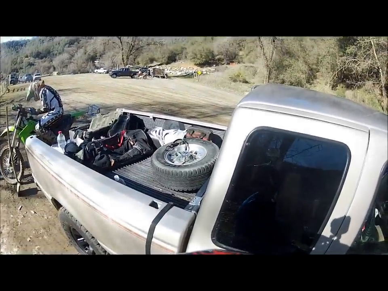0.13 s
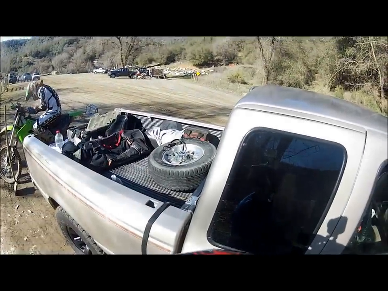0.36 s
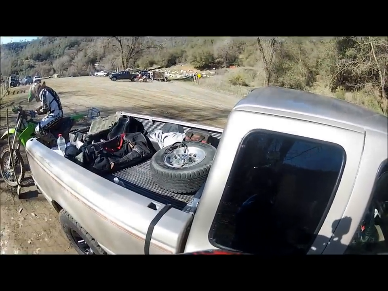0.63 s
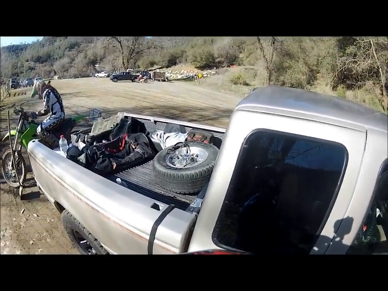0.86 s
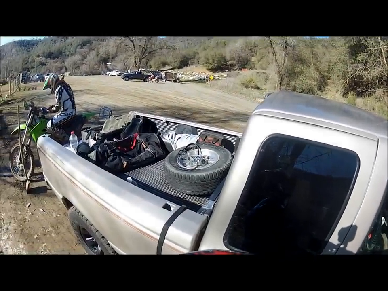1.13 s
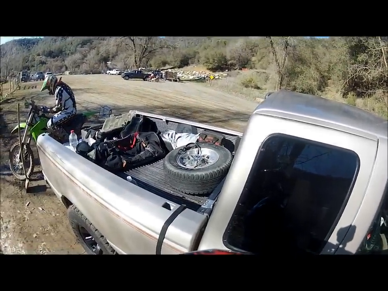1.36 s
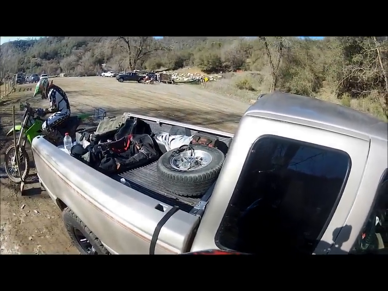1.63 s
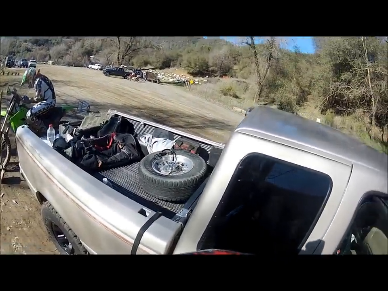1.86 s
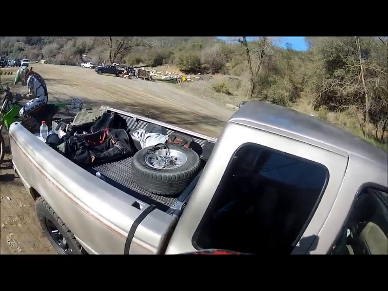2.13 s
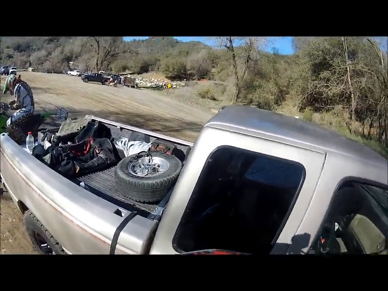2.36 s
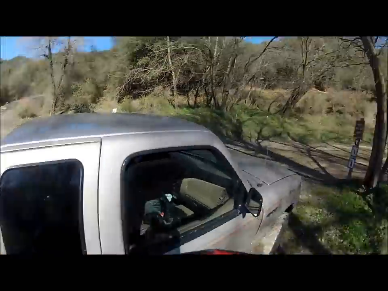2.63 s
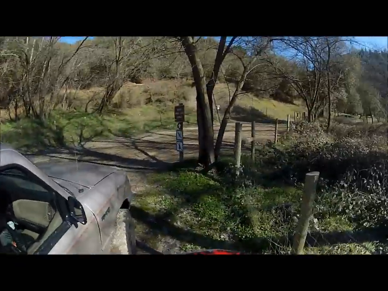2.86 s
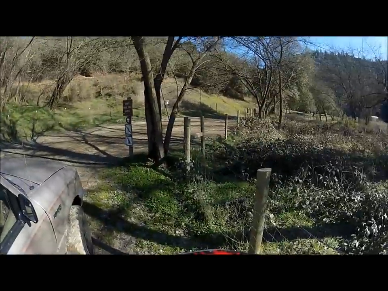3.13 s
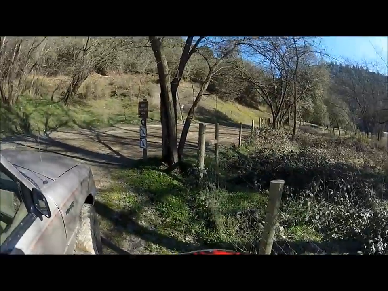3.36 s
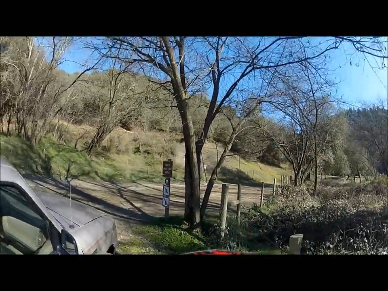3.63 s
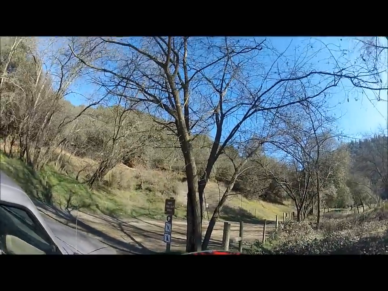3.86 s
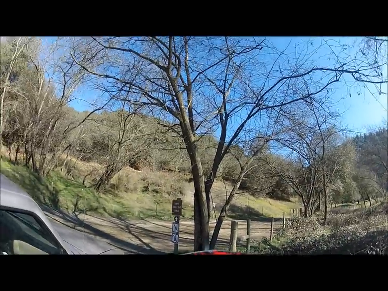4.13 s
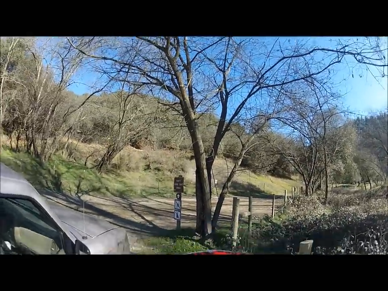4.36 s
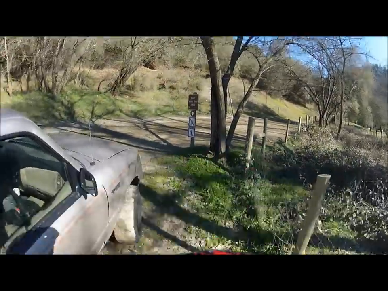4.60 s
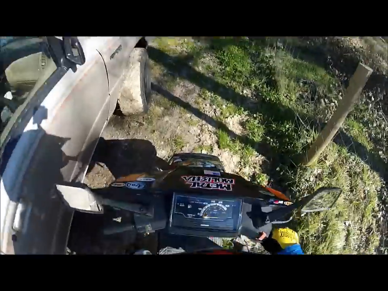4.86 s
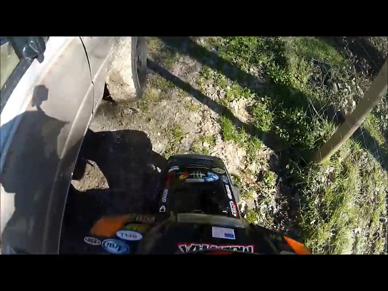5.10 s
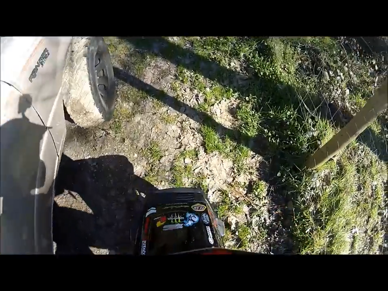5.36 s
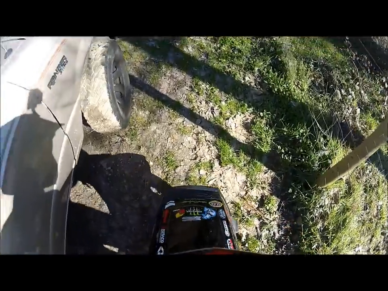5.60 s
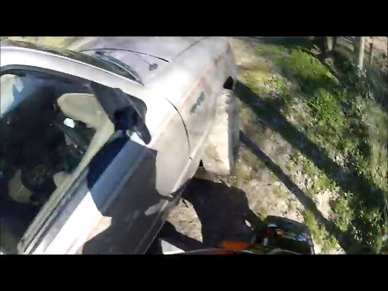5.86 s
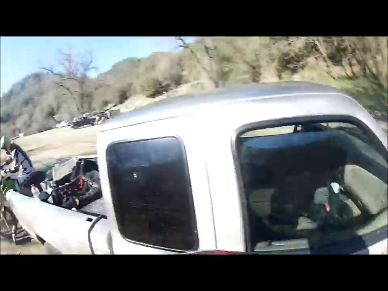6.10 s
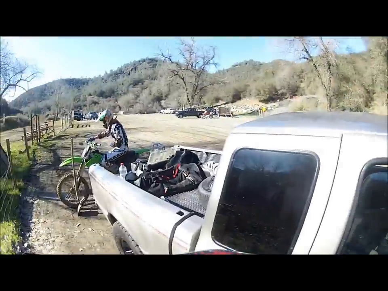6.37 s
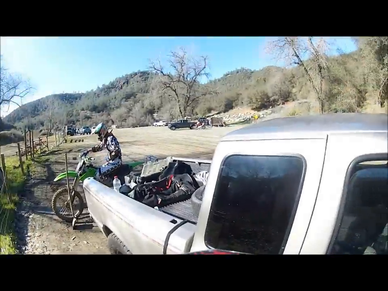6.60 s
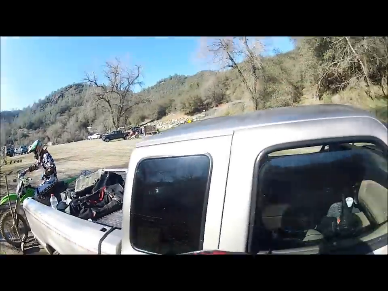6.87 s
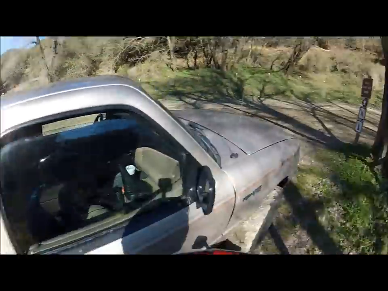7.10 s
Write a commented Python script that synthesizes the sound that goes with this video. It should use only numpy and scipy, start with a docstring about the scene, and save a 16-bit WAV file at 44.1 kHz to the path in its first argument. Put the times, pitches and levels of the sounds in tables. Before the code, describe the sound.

Close, gritty dirt bike engine: two throttle blips falling back to a slow thumping idle, one faint bird chirp, a gear clunk, then hard rising revs.

```python
"""Outdoors, under a rider's helmet: a single-cylinder four-stroke motorcycle idles, is blipped twice,
clunks into gear and revs away. Each cycle gives a skewed exhaust puff, its echoes in the pipe and a pumping
thump; load adds bark, rasp and knock. Filtered noise makes the drone, rumble, valve rattle and clunks.
A bird, a gliding sine with an overtone, chirps once. A slow converter clips the loudest puffs and holds
each sample, which mirrors the sound into the treble."""
import sys
import numpy as np
from scipy import signal
from scipy.fft import rfft, irfft, next_fast_len
from scipy.io import wavfile
from scipy.ndimage import uniform_filter1d, map_coordinates

SR = 44100
rng = np.random.default_rng(int(sys.argv[2]) if len(sys.argv) > 2 else 0)


def voltage_ratio(decibels):
    """Convert decibels (scalar or array-like) to amplitude ratios, 20 dB per decade."""
    exponent = np.asarray(decibels, float) / 20
    return 10 ** exponent


def put_to_file(sound):
    """Save the sound as 16-bit audio at rate SR, in the file named by the first command-line argument."""
    columns = np.atleast_2d(sound).T  # one column per channel
    safe = np.clip(columns, -1, 1)
    whole_steps = np.round(safe * 32767)
    wavfile.write(sys.argv[1], SR, whole_steps.astype(np.int16))


N = 318843
TIME = np.arange(N) / SR
SHUT_S = 0.09  # time constant of the throttle slide snapping shut


def unit(x):
    """Normalisation: scales x to rms 1."""
    return x / np.sqrt(np.mean(x ** 2) + 1e-20)


def curves(rows):
    """Linear interpolation: one value per sample for each column after the time."""
    s, *columns = np.transpose(rows)
    return [np.interp(TIME, s, column) for column in columns]


def filtered(x, response):
    """Linear filtering: multiplies the spectrum of x by a complex response of frequency."""
    size = next_fast_len(N + 8192)
    spectrum = rfft(x, size) * response(np.fft.rfftfreq(size, 1 / SR))
    return irfft(spectrum, size)[:N]


def coloured(x, points):
    """Spectral shaping: x through a curve of (frequency [Hz], level [dB]), at rms 1."""
    hz, db = np.transpose(points)
    return unit(filtered(x, lambda f: voltage_ratio(np.interp(np.log(f + 1), np.log(hz + 1), db))))


def noise():
    """White noise: independent Gaussian samples."""
    return rng.standard_normal(N)


def wobble(rate):
    """Random modulation: a smooth curve through rate random knots a second."""
    knots = rng.standard_normal(int(N * rate / SR) + 4)
    return map_coordinates(knots, [TIME * rate])


def train(times, sizes):
    """Impulse excitation: one sized impulse per time."""
    at = np.round(times * SR).astype(int)
    inside = (at >= 0) & (at < N)
    return np.bincount(at[inside], sizes[inside], N)


def puff(hz, width_hz, lag):
    """Gaussian wave packet: a short pressure swing of peak near 1, skewed by a phase lag in radians."""
    scale = SR / (2 * np.sqrt(2 * np.pi) * width_hz)
    return lambda f: scale * np.exp(-.5 * ((f - hz) / width_hz) ** 2 - 1j * lag)


def dying(x, t60):
    """Exponential decay: every impulse falls by 60 dB in t60 seconds."""
    return signal.lfilter([1], [1, -voltage_ratio(-60 / (t60 * SR))], x)


def resonances(modes):
    """Modal superposition: causal damped modes of (frequency [Hz], width [Hz], level [dB])."""
    def response(f):
        total = 0
        for k, (hz, width, db) in enumerate(modes):
            mode = 1j * f * width / (hz * hz - f * f + 1j * f * width)
            total = total + (-1) ** k * voltage_ratio(db) * mode
        return total
    return response


# speed of the engine: (time [s], rate [cycles/s])
CYCLE_RATE = [(0.0, 27.83), (0.29, 24.13), (0.43, 38.4), (0.76, 27.82), (1.35, 17.55), (1.71, 16.31),
              (1.84, 31.41), (2.0, 33.51), (2.07, 28.96), (2.73, 16.15), (3.35, 14.35), (3.63, 15.16),
              (4.04, 13.47), (4.29, 14.69), (4.9, 14.22), (5.15, 15.45), (5.85, 14.66), (6.13, 15.34),
              (6.36, 36.29), (6.67, 29.38), (6.82, 40.78), (7.23, 49.42)]
IDLE_HZ = 15  # cycles per second
ONE_FIRING_S = 4.3007  # a time at which the engine fires


def revs(times):
    """Normalised speed: engine speed over idle speed."""
    return np.interp(times, *np.transpose(CYCLE_RATE)) / IDLE_HZ


def crank():
    """Phase as integrated frequency: cycles turned at each sample, whole at every firing."""
    turned = np.cumsum(curves(CYCLE_RATE)[0]) / SR
    return turned - turned[round(ONE_FIRING_S * SR)]


def moments(turned, share):
    """Phase locking: the times at which each cycle has advanced by share."""
    whole = np.arange(np.floor(turned[0]), np.ceil(turned[-1]))
    return np.interp(whole + share, turned, TIME, left=N, right=N)


# twists of the throttle: (start [s], wide open [s], let go [s], usual knock level [dB])
THROTTLE_TWISTS = [(0.24, 0.347, 0.46, -17.5), (1.677, 1.777, 1.877, -25), (6.075, 6.22, 6.4, -47),
                   (6.6, 6.724, 7.39, -43)]


def throttle(times, fade_s):
    """Ramp and relaxation: each twist opens from 0 to 1, holds, and fades exponentially once let go."""
    t = times[:, None]
    start, wide, let_go, _ = np.transpose(THROTTLE_TWISTS)
    opened = np.clip((t - start) / (wide - start), 0, 1)
    released = np.exp(-np.clip(t - let_go, 0, None) / fade_s)
    return (opened * released).max(axis=1)


# cycles that burn badly: (time [s], change of puff [dB])
BAD_BURNS = [(0.0, -7), (0.031, -6), (0.103, -1), (0.508, -3.5), (0.656, -0.5), (0.724, -21), (0.758, -2.5),
             (0.951, -7), (1.123, -5.5), (1.173, -11), (1.44, -1.5), (2.04, -21), (2.107, -13),
             (2.252, -24), (2.291, -26), (2.421, -7), (2.57, -21), (2.679, -6), (2.738, -6.5), (2.86, -5),
             (3.941, -11.5), (4.086, -11), (5.254, -2), (5.652, -5), (6.534, -1), (6.567, -18),
             (6.629, -3.5)]
# levels at idle speed, drifting as the rider's head turns:
# (time [s], puff peak [dB], case drone [dB], valve rattle [dB])
HEAD_TURN = [(0, -4.5, -41, -50), (1.3, -5.5, -41.5, -49.5), (2.298, -6.5, -42.5, -50.5),
             (3.3, -7, -42, -46.5), (4.6, -7, -42.5, -46.5), (5.8, -4.5, -41, -52), (6.502, -6, -38, -53),
             (7.23, -4.5, -46, -43.5)]
PUFF_BOOST_DB, FUEL_LINGERS_S = 8.5, .13  # gain wide open; leftover fuel thinning out
LEAN_DB = 2  # scale of the random loss in starved cycles


def combustion(fire):
    """Cyclic variation: the puff level in dB of each firing, from throttle, starvation and bad burns."""
    s, idle_db = np.transpose(HEAD_TURN)[:2]
    shut = 1 - throttle(fire, SHUT_S)
    scatter, starving = rng.standard_normal((2, len(fire)))
    starved_db = LEAN_DB * shut * np.clip(revs(fire) - 1.1, 0, 1) * abs(starving)
    burn_db = np.interp(fire, s, idle_db) + PUFF_BOOST_DB * throttle(fire, FUEL_LINGERS_S)
    burn_db += (.15 + .6 * shut) * scatter - starved_db
    for when, change_db in BAD_BURNS:
        burn_db[np.argmin(abs(fire - when))] += change_db
    return burn_db


STEEP_FROM, STEEP_BY = 2.5, 3.3  # speeds over idle between which the puff turns to lead with its dip


def direct_puffs(fire, burn_db):
    """Pulsed outflow: the valve opens on burnt gas, and the puff crossfades to another skew at speed."""
    steep = np.clip((revs(fire) - STEEP_FROM) / (STEEP_BY - STEEP_FROM), 0, 1)
    gentle_puffs = filtered(train(fire, (1 - steep) * voltage_ratio(burn_db)), puff(185, 100, -.6))
    steep_puffs = filtered(train(fire - .0012, steep * voltage_ratio(burn_db)), puff(205, 110, .6))
    return gentle_puffs + steep_puffs


# returns of the puff along the pipe at idle: (delay [s], gain [ratio])
PIPE_RETURNS = [(.0093, 0.53), (0.0205, 0.067), (0.033, .06)]


def pipe_echoes(fire, burn_db):
    """Reflection: faster running heats the gas, so returns come sooner and weaker."""
    heat = revs(fire)
    returns = np.zeros(N)
    for delay, gain in PIPE_RETURNS:
        returns += train(fire + delay / heat ** 0.76, gain * voltage_ratio(burn_db) / heat ** 0.82)
    return filtered(returns, puff(75, 150, -0.047))


PUMP_DB, PUMP_OPEN_DB = -14, -7.5  # level at idle; change when wide open
PUMP_VACUUM_DB, VACUUM_FROM = 18, 1.635  # gain per idle speed above this speed over idle


def pumping(turned, fire):
    """Volume displacement: the piston sucks low thumps, deepest with a shut throttle at speed."""
    pump = moments(turned, 0.2182)
    opening = throttle(pump, SHUT_S)
    vacuum = (1 - opening) * np.clip(revs(pump) - VACUUM_FROM, 0, None)
    pump_db = PUMP_DB + PUMP_OPEN_DB * opening + PUMP_VACUUM_DB * vacuum
    jitter, scatter = rng.standard_normal((2, len(pump)))
    suck = -voltage_ratio(pump_db + 2.45 * scatter)
    # above idle, air also gulps back into the cylinder around the valve opening
    gulp = 0.28 * suck * np.clip(revs(fire) - 1.1, 0, 1)
    thumps = train(pump + 0.00152 * jitter, suck)
    thumps += train(fire - .0045, gulp) - train(fire - .0008, 0.27 * gulp)
    return filtered(thumps, puff(92.5, 64, 0.45))


# resonances of the silencer under load: (frequency [Hz], width [Hz], level [dB])
SILENCER_MODES = [(327, 56, -2), (502, 122, 0), (840, 310, -6.5), (1595, 210, -13.5), (1950, 210, -11.5),
                  (2780, 210, -15.5), (3840, 150, -19)]
# spectrum of torn gas at the outlet: (frequency [Hz], relative density [dB/Hz])
RASP_SPECTRUM = [(290, -51), (500, 6), (696, -9), (873, -7.5), (1220, -15), (1610, -13), (1890, -17),
                 (2720, -20.5), (3380, -27), (4850, -23.5), (5900, -37), (7670, -75), (13000, -120)]
RASP_DB = -35  # gain of the turbulent part
GROWL_DB, GROWL_T60_S, GROWL_RISE_S = -26.5, 0.064, .002  # the part that repeats alike at every firing


def outlet(fire, burn_db):
    """Nonlinear steepening and turbulence: bark, rasp and growl grow quicker than the puff."""
    load = voltage_ratio(2.28 * burn_db) * revs(fire) ** 0.64
    bark = voltage_ratio(8.5) * filtered(train(fire - .001, load), resonances(SILENCER_MODES))
    gusts = uniform_filter1d(dying(train(fire + 0.0028, load), 0.04), size=200)
    rasp = voltage_ratio(RASP_DB) * gusts * coloured(noise(), RASP_SPECTRUM)
    t = TIME[:SR // 10]
    envelope = voltage_ratio(-60 * t / GROWL_T60_S) * (1 - np.exp(-t / GROWL_RISE_S))
    burst = coloured(noise(), RASP_SPECTRUM)[:len(t)] * envelope
    growl = voltage_ratio(GROWL_DB) * signal.fftconvolve(train(fire, load), burst)[:N]
    return bark + rasp + growl


def exhaust(turned):
    """Superposition: puffs, pipe echoes, pumping thumps and outlet noise add at every cycle."""
    fire = moments(turned, 0)
    burn_db = combustion(fire)
    puffs = direct_puffs(fire, burn_db) + pipe_echoes(fire, burn_db)
    return puffs + pumping(turned, fire) + outlet(fire, burn_db)


KNOCK_LEAD_S, KNOCK_SCATTER_DB, KNOCK_FROM = .007, 1.5, .25  # last: least opening that knocks


def knock(turned):
    """Detonation: sudden load rings the charge briefly, just before the exhaust opens."""
    out, t = np.zeros(N + SR), np.arange(SR // 20) / SR
    fire = moments(turned, 0)
    chance = rng.standard_normal((len(fire), 3))
    opening = throttle(fire, SHUT_S)
    for start, _, let_go, db in THROTTLE_TWISTS:
        during = (fire > start) & (opening > KNOCK_FROM) & (fire < min(let_go, TIME[-1]))
        for s, (detune, phase, size) in zip(fire[during] - KNOCK_LEAD_S, chance[during]):
            ring = np.sin(2 * np.pi * 2780 * (1 + .008 * detune) * t + phase)
            decay = voltage_ratio(db + KNOCK_SCATTER_DB * size - 60 * t / 0.045)
            out[round(s * SR):][:len(t)] += decay * (1 - np.exp(-t / 0.00085)) * ring
    return out[:N]


# spectrum of the case drone: (frequency [Hz], relative density [dB/Hz])
DRONE_SPECTRUM = [(220, -23.5), (380, -1.5), (421, -7.5), (570, -3.5), (623, -7.5), (690, -5), (778, -17.5),
                  (1100, -39.5), (1430, -28), (2420, -120)]
# spectrum of the deep rumble: (frequency [Hz], relative density [dB/Hz])
RUMBLE_SPECTRUM = [(18, -47), (30, -80), (86, 7.5), (189, -8), (240, -5), (312, -1.5), (400, -24.5),
                   (520, -49), (880, -120)]
DRONE_PER_OCTAVE_DB = 10.5  # rise per doubling of speed


def case_drone(turned):
    """Amplitude modulation: a drone swells after each firing, over a wavering rumble that does not."""
    # both follow engine speed and the turning head
    drone_db = curves(HEAD_TURN)[1] + DRONE_PER_OCTAVE_DB * np.log2(revs(TIME))
    swell_db = 2.35 * np.cos(2 * np.pi * turned - 1.2) + 1.04 * wobble(30)
    drone = voltage_ratio(drone_db + swell_db) * coloured(noise(), DRONE_SPECTRUM)
    rumble = voltage_ratio(drone_db + 5.5 + 1.15 * wobble(19)) * coloured(noise(), RUMBLE_SPECTRUM)
    return drone + rumble


# ringing metal of the cylinder head: (frequency [Hz], width [Hz], level [dB])
HEAD_MODES = [(1690, 73, -28), (2093, 185, 9.5), (2807, 57, -1.5), (3980, 97, -27), (4930, 190, 4.5)]
# spectrum of the valve rattle: (frequency [Hz], relative density [dB/Hz])
RATTLE_SPECTRUM = [(530, 0.5), (900, -3.5), (958, -12), (1200, -6.5), (1440, -7), (1570, -6.5),
                   (2820, -0.5), (3400, -9.5), (3950, -5), (4960, -17.5), (5900, -18.5), (7670, -58),
                   (13000, -120)]
# spectrum of the tappet clicks: (frequency [Hz], relative density [dB/Hz])
TAPPET_SPECTRUM = [(1500, -32), (2600, 8.5), (4000, 0), (5200, -3.5), (5900, -12.5), (7670, -50),
                   (13000, -120)]
RATTLE_PER_OCTAVE_DB, RATTLE_OPEN_DB = 7.5, 8  # rise per doubling of speed; gain wide open
TICK_DB, TICK_SCATTER_DB, TICK_T60_S = -2.5, 3.5, 0.032  # tappet click over the rattle


def valve_gear(turned):
    """Forced vibration: noise swelling around each firing rings the head, and a tappet clicks each cycle."""
    rattle_db = curves(HEAD_TURN)[2] + RATTLE_PER_OCTAVE_DB * np.log2(revs(TIME))
    rattle_db += RATTLE_OPEN_DB * throttle(TIME, SHUT_S)
    angle = 2 * np.pi * turned
    chuff_db = 1.2 * np.cos(angle - .2) + 0.26 * np.cos(2 * angle - .4) + 1.5 * wobble(60)
    head = resonances(HEAD_MODES)
    ringing = filtered(noise() * voltage_ratio(chuff_db), lambda f: 1 + head(f))
    rattle = coloured(ringing, RATTLE_SPECTRUM)
    lift = moments(turned, 0.025)
    tick_db = TICK_DB + TICK_SCATTER_DB * rng.standard_normal(len(lift))
    clicks = dying(train(lift, voltage_ratio(tick_db)), TICK_T60_S) * coloured(noise(), TAPPET_SPECTRUM)
    return voltage_ratio(rattle_db) * (rattle + clicks)


# gearbox clunks: (time [s], level [dB], rattle length [s])
GEAR_CLUNKS = [(5.989, -8.5, 0.023), (6.078, -20.5, 0.021)]
# spectrum of the clunks: (frequency [Hz], relative density [dB/Hz])
CLUNK_SPECTRUM = [(59, -52), (100, -31), (198, 11), (308, -9), (621, -2), (919, -29), (2350, -22),
                  (3300, -33.5), (4190, -33), (5900, -44), (7670, -84), (13000, -120)]


def gearbox():
    """Impact and free decay: the dogs chatter as the gear drops in, then the case rings out."""
    level = np.zeros(N)
    for s, db, length in GEAR_CLUNKS:
        t = TIME - s
        decay = voltage_ratio(db - 60 * np.clip(t - length, 0, None) / 0.11)
        level += decay * np.clip(t / 0.0022, 0, 1)
    return level * coloured(noise(), CLUNK_SPECTRUM)


# one chirp: (time [s], pitch [Hz], mean level [dB])
BIRD_CHIRP = [(3.94, 2754, -51), (3.958, 2680, -42.5), (3.998, 3400, -57), (4.036, 4900, -49),
              (4.06, 4900, -58)]


def bird():
    """Frequency modulation: a rising whistle, hoarse from random jitter, with a weak second harmonic."""
    hz, db = curves(BIRD_CHIRP)
    from_ends = np.minimum(TIME - BIRD_CHIRP[0][0], BIRD_CHIRP[-1][0] - TIME)
    edge = np.clip(from_ends / 0.0048, 0, 1)
    phase = 2 * np.pi * np.cumsum(hz * (1 + 0.013 * wobble(200))) / SR
    whistle = np.sin(phase) + voltage_ratio(-10) * np.sin(2 * phase)
    return np.sqrt(2) * edge * voltage_ratio(db + 6.4 * wobble(89.8)) * whistle


def scene():
    """Superposition in air: all sources reach one microphone, which drops the deepest bass."""
    turned = crank()
    engine = exhaust(turned) + knock(turned) + case_drone(turned) + valve_gear(turned)
    air = engine + gearbox() + bird()
    return filtered(air, lambda f: 1 / np.sqrt(1 + (70 / (f + 1)) ** 7))[None]


def roll_off(x):
    """The treble ends steeply here."""
    return signal.sosfilt(signal.butter(12, 16120, fs=SR, output="sos"), x)


CONVERTER_HZ = 12000


def record(dry):
    """Sample and hold: slow sampling, clipping, and each sample held four steps, which leaves images."""
    slow = signal.resample_poly(dry, CONVERTER_HZ // 300, SR // 300, axis=1)
    clipped = slow / (1 + abs(slow) ** 12) ** (1 / 12)  # rounded knee below full scale
    held = np.repeat(clipped, 4, axis=1)
    back = signal.resample_poly(held, SR // 300, 4 * CONVERTER_HZ // 300, axis=1)[:, :N]
    mix = np.pad(back, ((0, 0), (0, N - back.shape[1])))
    return roll_off(mix)


dry = scene()
out = record(dry)
put_to_file(out)
```